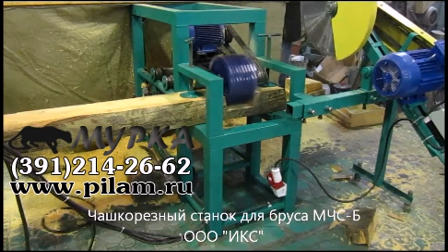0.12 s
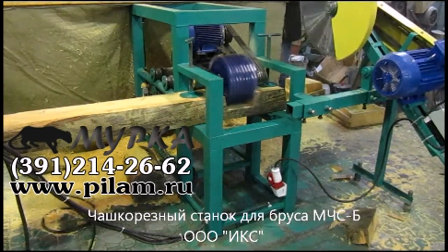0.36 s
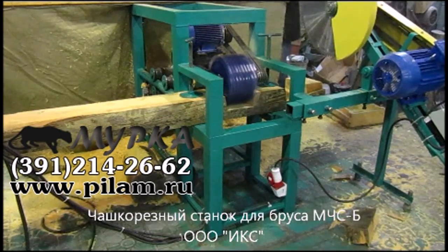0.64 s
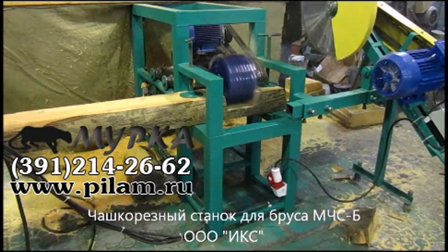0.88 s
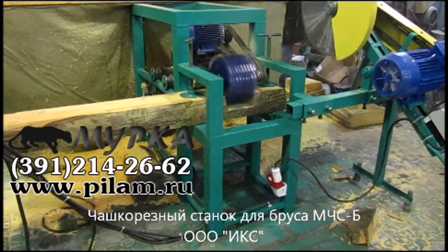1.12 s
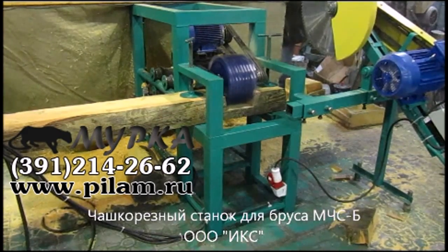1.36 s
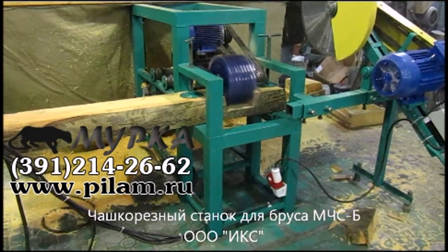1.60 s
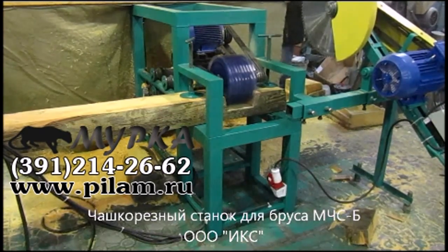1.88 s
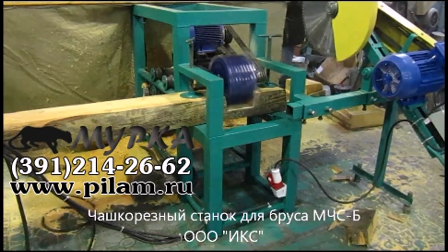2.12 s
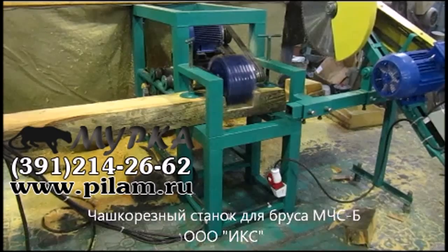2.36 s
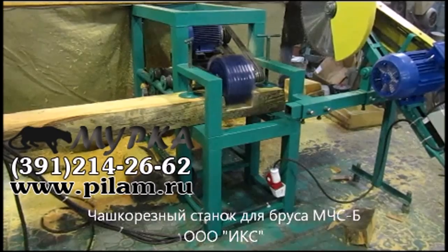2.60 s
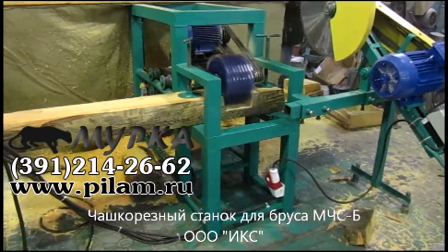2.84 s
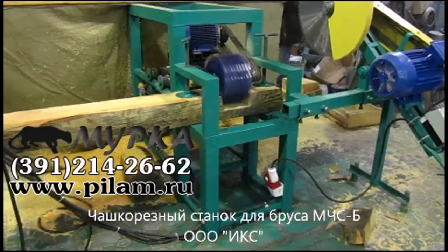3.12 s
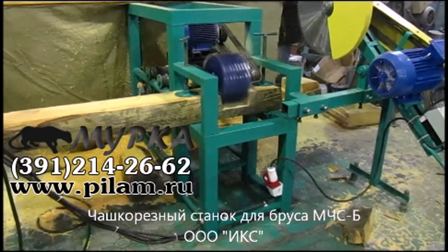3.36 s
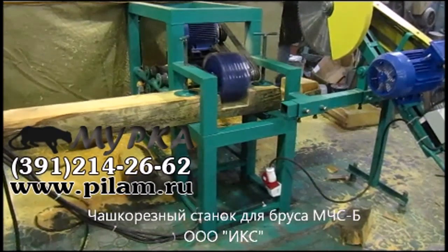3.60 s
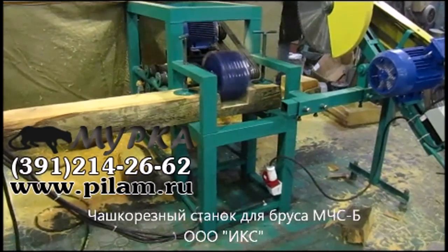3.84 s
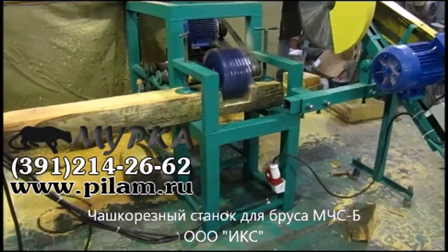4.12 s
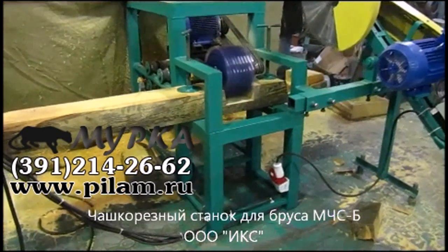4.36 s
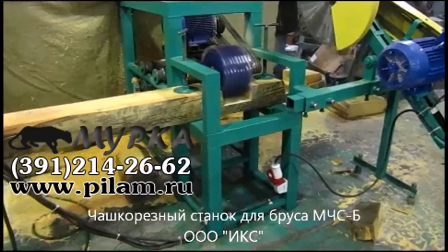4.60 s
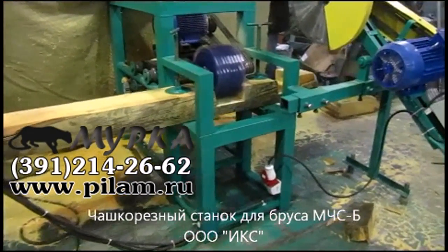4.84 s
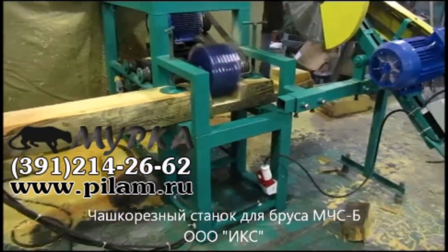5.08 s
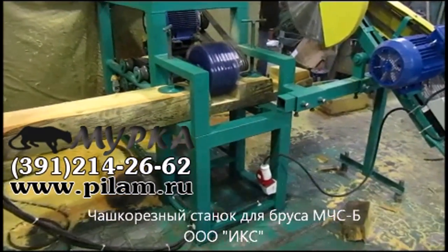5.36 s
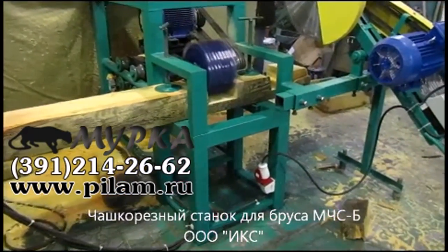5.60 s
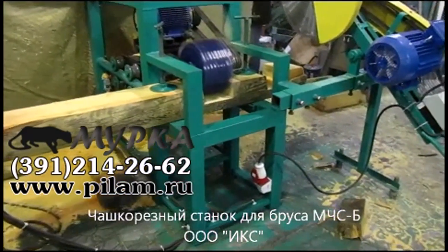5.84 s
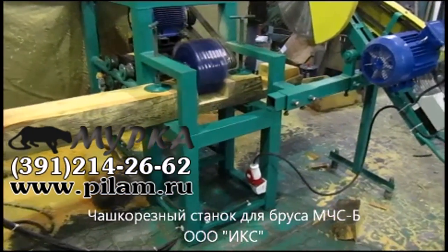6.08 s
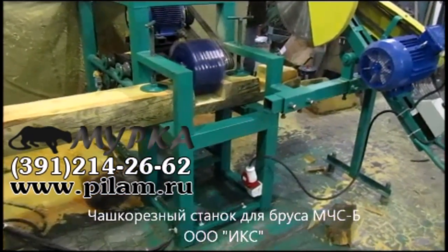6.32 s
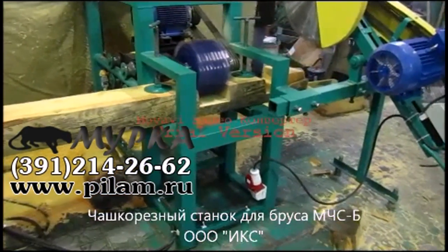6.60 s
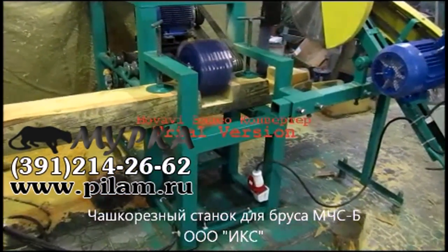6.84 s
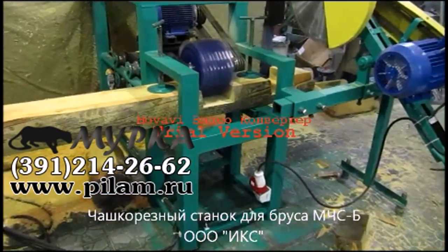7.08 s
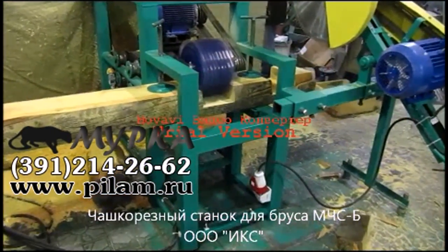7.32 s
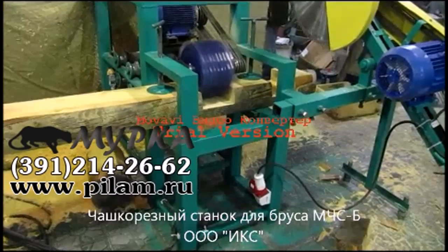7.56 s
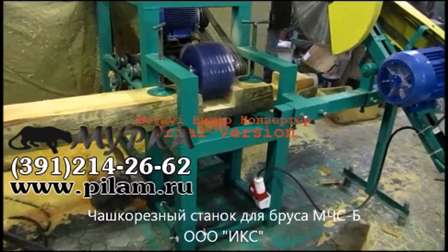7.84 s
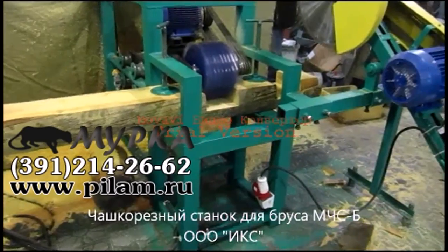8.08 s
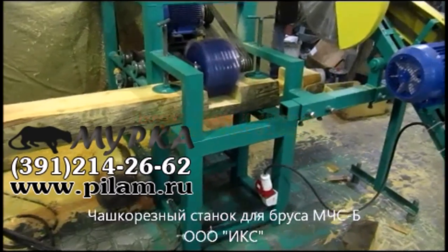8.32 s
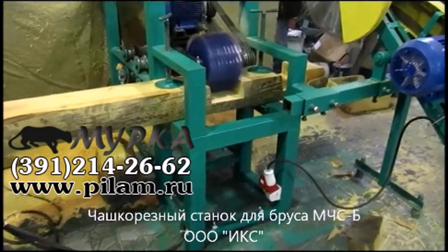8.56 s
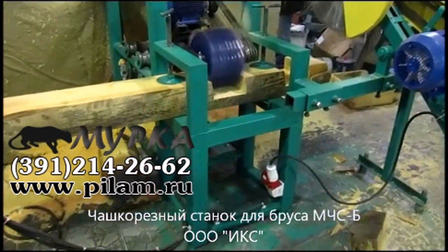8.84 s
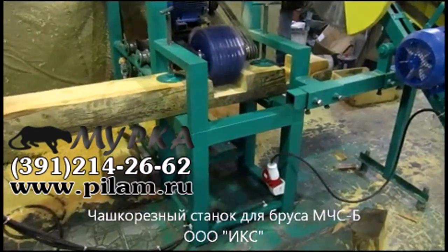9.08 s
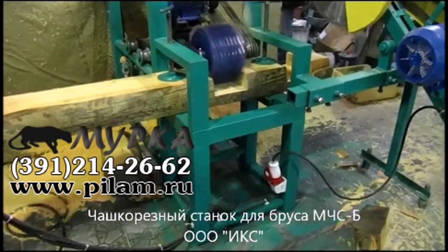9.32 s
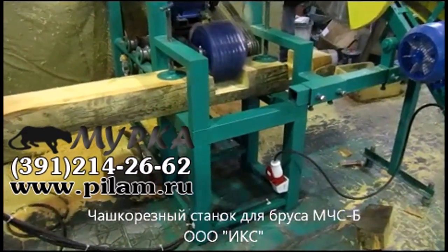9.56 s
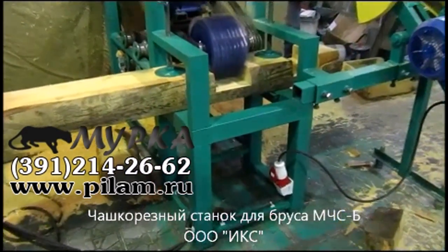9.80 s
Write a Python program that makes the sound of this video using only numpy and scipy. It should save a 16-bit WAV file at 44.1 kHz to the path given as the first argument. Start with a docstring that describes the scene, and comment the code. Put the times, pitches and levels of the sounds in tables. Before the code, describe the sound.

A motor-driven cutter drum mills a wooden beam with a loud, steady nasal whine and dense hissing roar, then cuts abruptly to silence.

```python
"""Cutter drum milling a beam

A six-knife drum spins in a steel frame and mills a notch into a beam, in a workshop.
The knives sound a harmonic stack of tones, each a direct wave plus echoes off frame and beam: as the
drum travels the echoes slide, so the tones swell and fade. Faint sines mark the turning shaft, and
shaped stereo noise makes the roar of air and chips. The drum comes clear of the frame, then all cuts off.
"""
import sys
import numpy as np
from scipy import signal
from scipy.io import wavfile
from scipy.ndimage import uniform_filter1d

SR = 44100
rng = np.random.default_rng(int(sys.argv[2]) if len(sys.argv) > 2 else 0)


def waveform_to_disk(signal):
    """Save audio, clipped to [-1, 1], as 16-bit WAV at the path in sys.argv[1]."""
    frames = np.transpose(np.atleast_2d(signal))
    scaled = np.clip(frames, -1, 1) * 32767
    samples = np.round(scaled).astype(np.int16)
    wavfile.write(sys.argv[1], SR, samples)


def to_linear_factor(level_db):
    """Convert decibel levels (scalar or array-like) to linear amplitude factors."""
    exponent = np.asarray(level_db, float) / 20
    return 10 ** exponent


N = 438354

# knife passes per second: (time [s], rate [Hz])
KNIFE_RATE = [(0, 515.3), (2, 515.37), (4, 515.54), (6, 515.58), (9, 515.59)]
# imbalance of the drum: (multiple of the shaft rate, rms level [dB])
SHAFT_TONES = [(1, -56), (2, -49), (59, -53), (61, -56)]
# loudness of the roar: (time [s], level [dB])
ROAR_LEVEL = [(0, -13.5), (1.7, -13), (2.3, -14), (2.9, -13), (5, -13), (8.2, -13), (9, -13.5)]
# spectrum of the roar with the drum hidden: (frequency [Hz], relative density [dB per Hz])
ROAR_SPECTRUM = [(80, -32.5), (150, -21.5), (270, -10.5), (460, -11.5), (950, -4.5), (1400, -12),
                 (1750, -9), (2200, -12), (2550, -8), (3300, -16), (3900, -27.5), (4900, -20),
                 (7200, -22.5), (10000, -31.5), (13000, -43), (14400, -48.5)]
# gain of the roar as the drum comes clear of the frame: (frequency [Hz], gain [dB])
CLEAR_GAIN = [(300, 0), (1000, 0), (2500, 0.5), (3900, 3.5), (5000, 2), (7200, 1), (12000, 0.5)]
# how alike the roar is left and right: (frequency [Hz], correlation [0 to 1])
LIKENESS = [(60, 0.73), (150, 0.94), (370, 0.96), (920, 0.95), (2270, 0.92), (3900, 0.87), (5000, 0.82),
            (8000, 0.73), (14000, 0.47)]
# stereo balance: (frequency [Hz], left over right [dB])
BALANCE = [(100, -.9), (300, -1.5), (700, -1.1), (1500, -.5), (5000, -.8), (12000, -.2)]
# mean phase lead of the left side in the tones: (frequency [Hz], lead [radians])
LEFT_LEAD = [(515, -0.5), (1030, -0.37), (1550, .05), (5000, -.2), (9000, .1)]
# the roar flickers in small specks: (frequency [Hz], rms depth [dB])
SPECK_DEPTH = [(300, .6), (5000, 1.3), (9000, 3.6), (12000, 4.5)]
# echoes off frame and beam, against the direct wave:
# (extra path [cm], its growth [cm per cm of travel], level at the knife rate [dB])
ECHOES = [(73.14, .041, .9), (16.33, .036, 3.1), (64.67, -.181, -3.8), (11.1, .452, -11),
          (18.03, .717, -6.7), (33.89, .929, -4.2), (51.07, 1, -9)]
# the tones ride on the roar's spectrum: (frequency [Hz], tone rms over ROAR_SPECTRUM [dB])
TONE_OVER = [(515, -9), (1030, -19), (1550, -19), (2060, -17.5), (2600, -22), (5200, -20), (5700, -23),
             (6200, -18), (7200, -22.5), (8200, -25.5), (9300, -26.5), (9800, -19), (10300, -27.5),
             (14400, -21)]
# how far the drum has moved across the beam: (time [s], travel [cm])
TRAVEL = [(0, 0), (1, .82), (2, 1.18), (3, 3.92), (4.5, 13.05), (6.5, 22.27), (9, 32.73)]
# late swell of the highest tones: (frequency [Hz], gain [dB])
TOP_SWELL = [(11000, 0), (12400, 8), (14400, 17)]

KNIVES, TONE_COUNT = 6, 28
SOUND_CM_PER_S, ECHO_DB_PER_OCTAVE = 34300, -1.9
EMERGE_S, EMERGE_OVER_S = 3.55, 0.5  # the drum comes clear of the frame
TOP_SWELL_S, TOP_SWELL_OVER_S = 8.2, 0.4
TONE_CLEAR = 1.5  # the tones gain this many times CLEAR_GAIN
LOW_CUT_HZ, STOP_S = 80, 8.9622


def evened(x):
    """Scales to rms 1."""
    return x / np.sqrt(np.mean(x ** 2) + 1e-20)


def read(points, hz):
    """Reads a spectrum on a log-frequency axis."""
    f, value = np.transpose(points)
    return np.interp(np.log(hz + 1), np.log(f + 1), value)


def curve(rows, t):
    """Reads a time table at the times t."""
    times, values = np.transpose(rows)
    return np.interp(t, times, values)


def ramp(t, start_s, length_s):
    """Rises from 0 to 1."""
    return np.clip((t - start_s) / length_s, 0, 1)


def sides(hz):
    """Left and right gains at a frequency."""
    return to_linear_factor(np.outer([0.5, -0.5], read(BALANCE, hz)))


def sliding_s(t, growth):
    """Change of a sound path's delay as the drum travels; growth in cm of path per cm of travel."""
    return growth * curve(TRAVEL, t) / SOUND_CM_PER_S


def knife_turns():
    """Count of knife passes at every sample."""
    return np.cumsum(curve(KNIFE_RATE, np.arange(N) / SR)) / SR


def echo_sum(k, hz, t):
    """Direct wave plus echoes of tone k: sliding delays make them add up or cancel."""
    paths = 1
    for cm, growth, db in ECHOES:
        delay_s = cm / SOUND_CM_PER_S + sliding_s(t, growth)
        paths = paths + to_linear_factor(db + ECHO_DB_PER_OCTAVE * np.log2(k)) * np.exp(-2j * np.pi * hz * delay_s)
    return paths / np.sqrt(np.mean(abs(paths[t < STOP_S]) ** 2))


def whine(lead_swing=0.11, lead_growth=0.32):
    """Harmonics of the knife rate, each swelling and fading as its echoes slide (lead_swing in radians)."""
    hop = 64  # samples between updates of the echoes
    t = np.arange(0, N + hop, hop) / SR
    rate_hz = np.mean(KNIFE_RATE, 0)[1]
    turns = knife_turns()
    out = np.zeros((2, N))
    for k, (start, skew) in enumerate(rng.random((TONE_COUNT, 2)), 1):
        hz = k * rate_hz
        level_db = read(ROAR_SPECTRUM, hz) + read(TONE_OVER, hz)
        clear_db = TONE_CLEAR * read(CLEAR_GAIN, hz) * ramp(t, EMERGE_S, EMERGE_OVER_S)
        swell_db = read(TOP_SWELL, hz) * ramp(t, TOP_SWELL_S, TOP_SWELL_OVER_S)
        tone = echo_sum(k, hz, t) * to_linear_factor(level_db + clear_db + swell_db)
        # the two microphone ports hear the tone at slightly different phases, drifting with the travel
        drift = np.sin(2 * np.pi * (hz * sliding_s(t, lead_growth) + skew))
        lead = read(LEFT_LEAD, hz) + lead_swing * drift
        ports = sides(hz) * tone * np.exp(0.5j * np.outer([1, -1], lead))
        ports = np.repeat(ports, hop, axis=1)[:, :N]
        out += np.sqrt(2) * (ports * np.exp(2j * np.pi * (k * turns + start))).real
    return out


def shaft():
    """Faint sines at multiples of the drum's turning rate, from its imbalance."""
    turns = knife_turns() / KNIVES
    return sum(to_linear_factor(db) * np.sqrt(2) * np.sin(2 * np.pi * round(k) * turns) for k, db in SHAFT_TONES)


def roar(echo_ms=1.17, echo_growth=0.074, echo=0.07, patchy_db=0.53, flicker_db=0.32, beat=0.02):
    """Air and chips thrown off the drum: patchy noise, treble rippled by a near echo, beating once a turn."""
    size, hop = 2048, 512
    frames, hz = N // hop + 5, np.fft.rfftfreq(size, 1 / SR)
    t = np.arange(frames) * hop / SR
    a, b, c, d, patches, specks = rng.standard_normal((frames, len(hz), 6)).T
    # smooth over frequency, then over time: fine specks, broad patches, whole-band flicker
    specks = evened(uniform_filter1d(uniform_filter1d(specks, size=3, axis=0), size=4, axis=1))
    patches = evened(uniform_filter1d(uniform_filter1d(patches, size=24, axis=0), size=6, axis=1))
    flicker = evened(uniform_filter1d(rng.standard_normal(frames), size=3))

    same = np.clip(read(LIKENESS, hz), -1, 1)[:, None]
    left = a + 1j * b
    right = same * left + np.sqrt(1 - same ** 2) * (c + 1j * d)
    z = np.array([left, right]) * sides(hz)[:, :, None]

    delay_s = echo_ms / 1000 + sliding_s(t, echo_growth)  # the echo slides with the travel
    treble = hz[:, None] > 4200
    ripple = abs(1 + echo * treble * np.exp(2j * np.pi * np.outer(hz, delay_s)))
    clear_db = np.outer(read(CLEAR_GAIN, hz), ramp(t, EMERGE_S, EMERGE_OVER_S))
    speck_db = read(SPECK_DEPTH, hz)[:, None] * specks
    z *= to_linear_factor(read(ROAR_SPECTRUM, hz))[:, None] * ripple
    z *= to_linear_factor(clear_db + speck_db + patchy_db * patches + flicker_db * flicker)

    noise = evened(signal.istft(z, nperseg=size, noverlap=size - hop)[1][:, :N])
    puffs = 1 + beat * np.cos(2 * np.pi * knife_turns() / KNIVES)
    return noise * puffs * to_linear_factor(curve(ROAR_LEVEL, np.arange(N) / SR))


def scene():
    """Knife tones, shaft tones and roar together."""
    return whine() + shaft() + roar()


def top_cut(x):
    """Nothing passes above the cut-off."""
    return signal.sosfilt(signal.butter(12, 14590, fs=SR, output="sos"), x)


def record(dry):
    """The microphone cuts the deep bass, peaks beyond full scale clip and the sound is cut off."""
    low_cut = signal.butter(2, LOW_CUT_HZ, "high", fs=SR, output="sos")
    thin = signal.sosfilt(low_cut, dry)
    running = np.arange(N) < STOP_S * SR
    return top_cut(np.clip(thin, -1, 1) * running)


dry = scene()
out = record(dry)
waveform_to_disk(out)
```